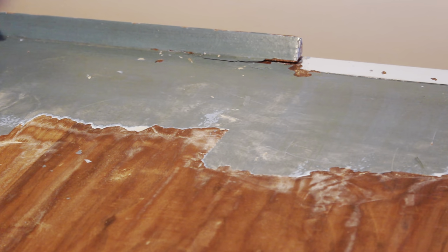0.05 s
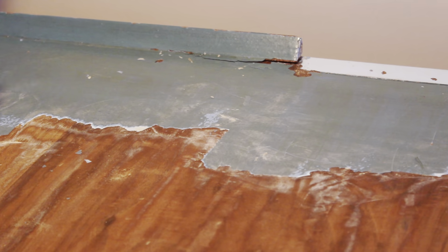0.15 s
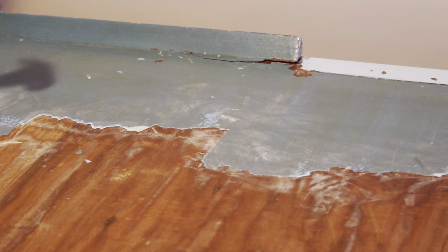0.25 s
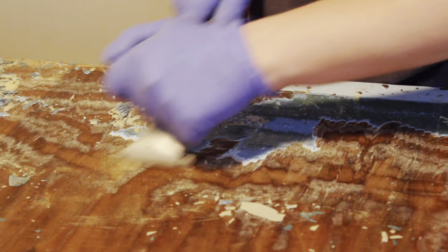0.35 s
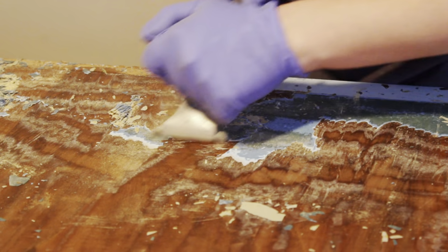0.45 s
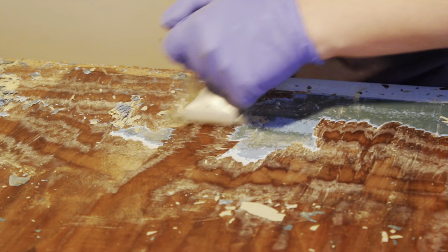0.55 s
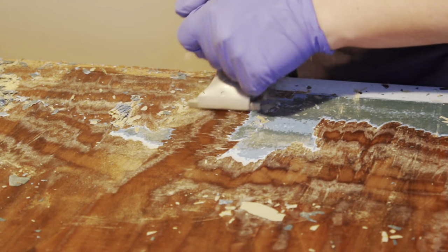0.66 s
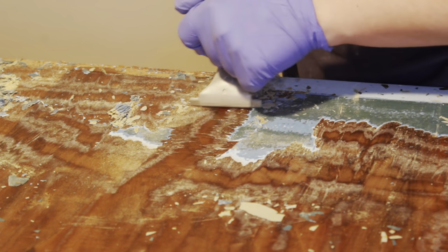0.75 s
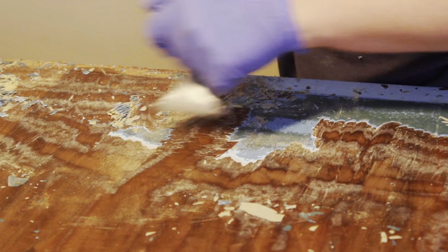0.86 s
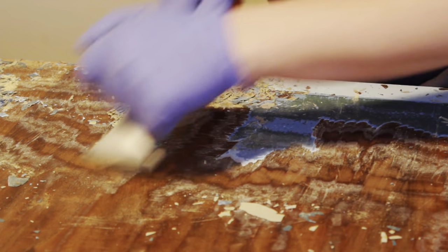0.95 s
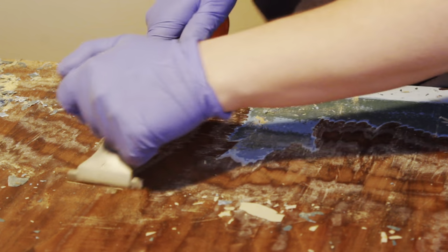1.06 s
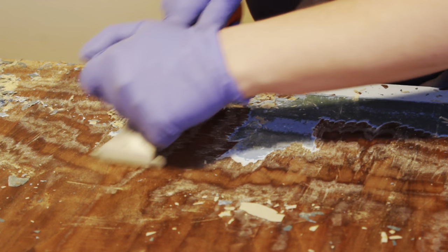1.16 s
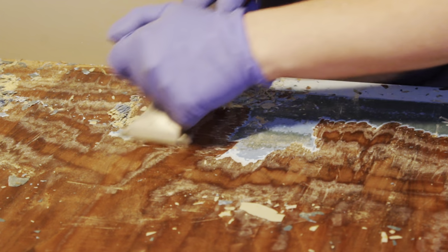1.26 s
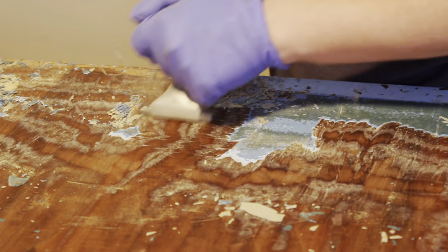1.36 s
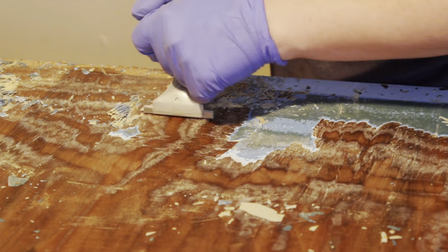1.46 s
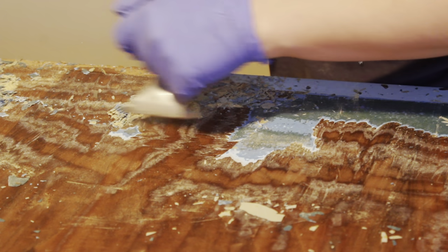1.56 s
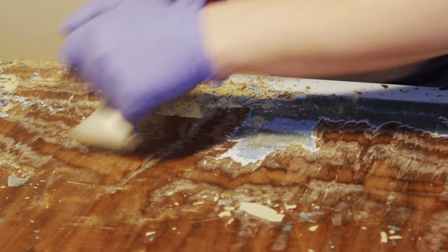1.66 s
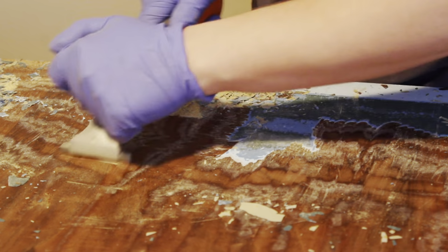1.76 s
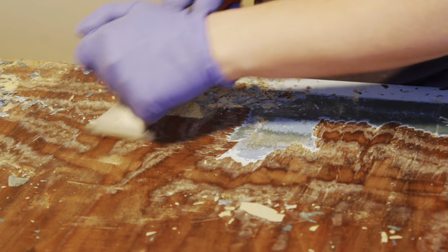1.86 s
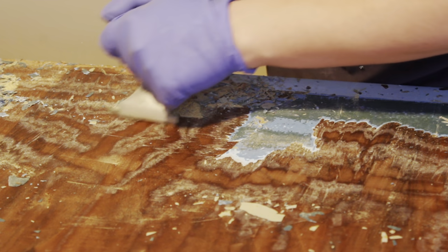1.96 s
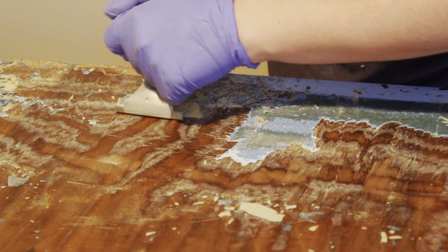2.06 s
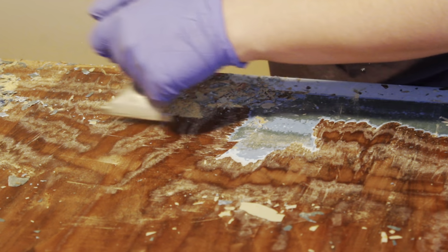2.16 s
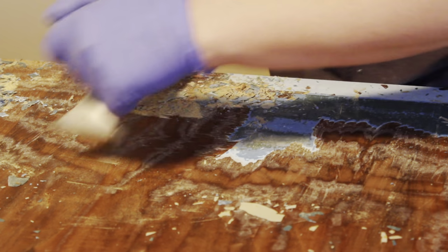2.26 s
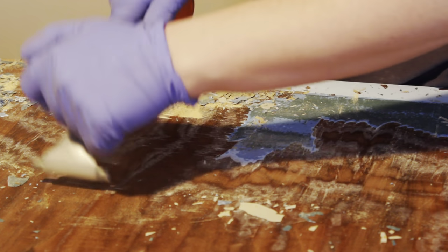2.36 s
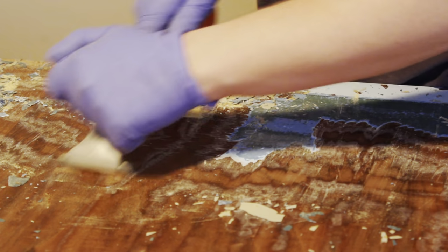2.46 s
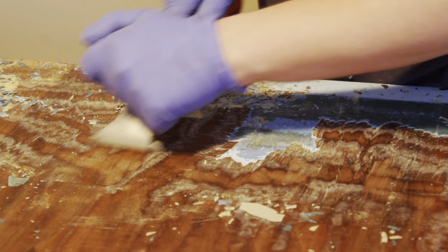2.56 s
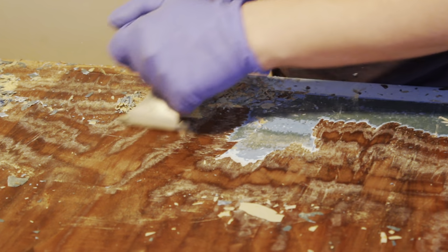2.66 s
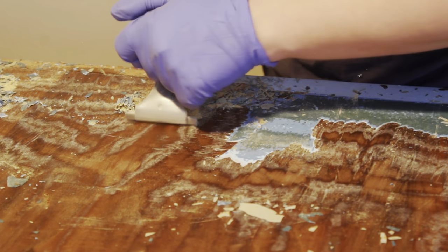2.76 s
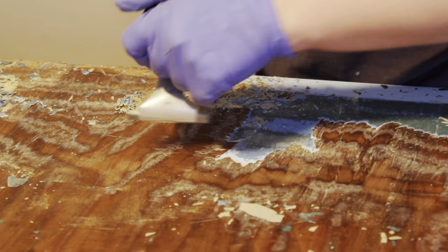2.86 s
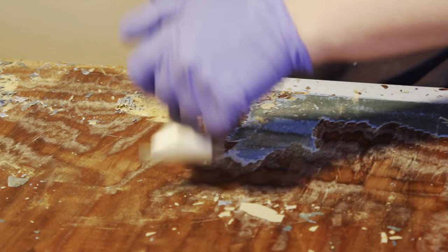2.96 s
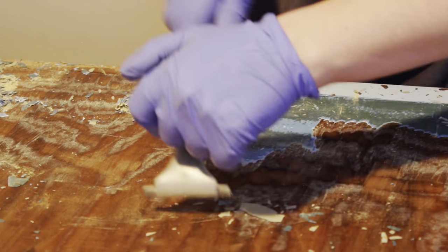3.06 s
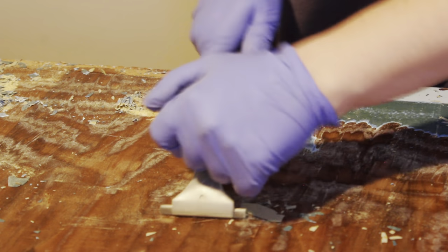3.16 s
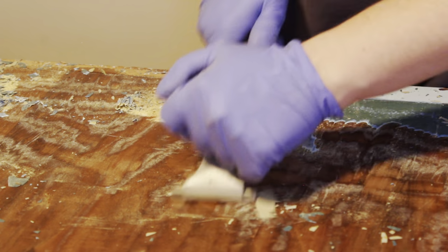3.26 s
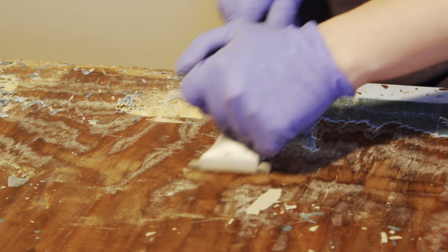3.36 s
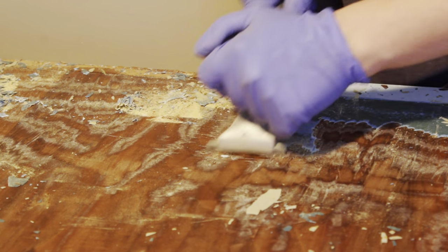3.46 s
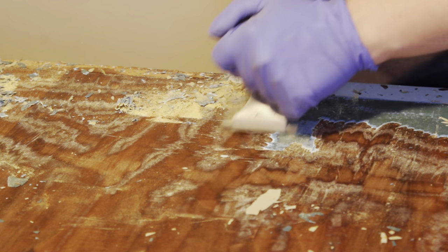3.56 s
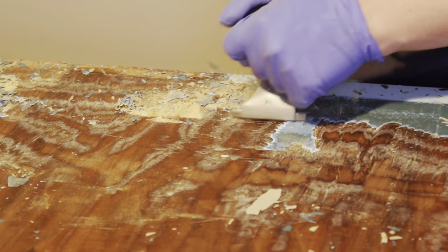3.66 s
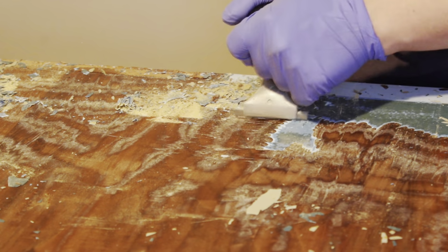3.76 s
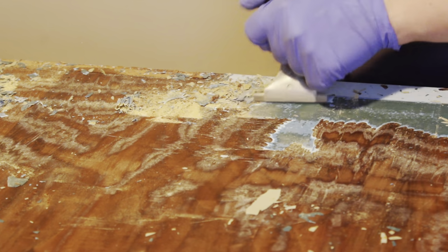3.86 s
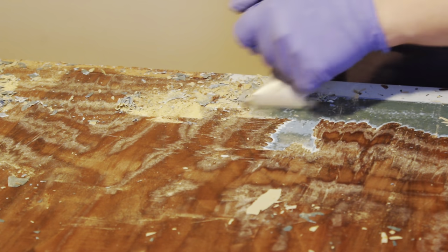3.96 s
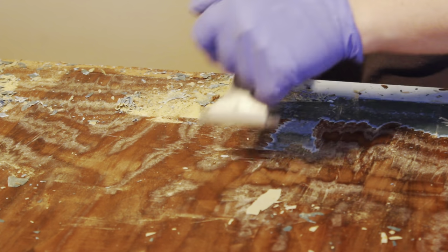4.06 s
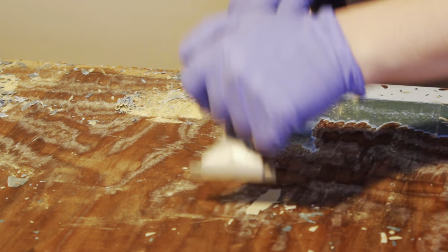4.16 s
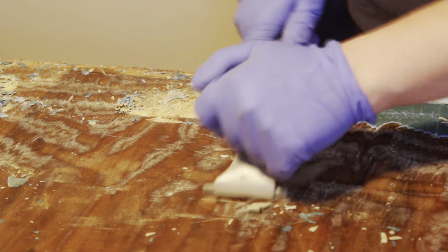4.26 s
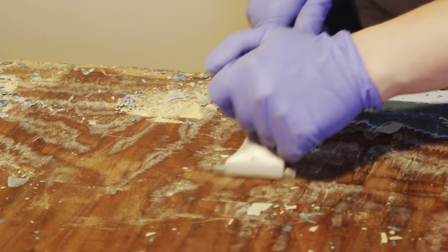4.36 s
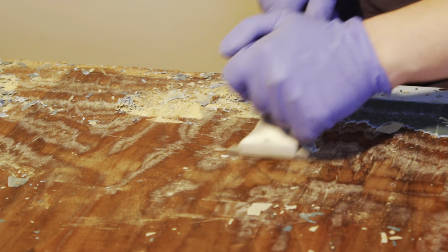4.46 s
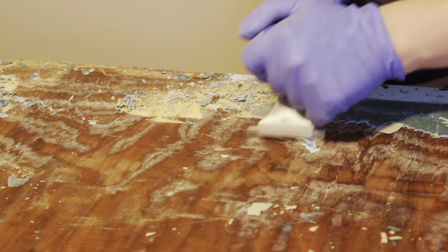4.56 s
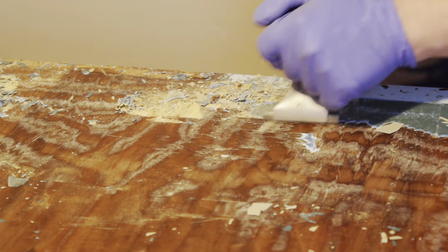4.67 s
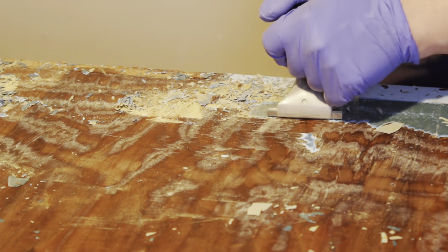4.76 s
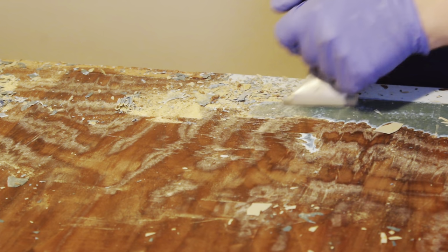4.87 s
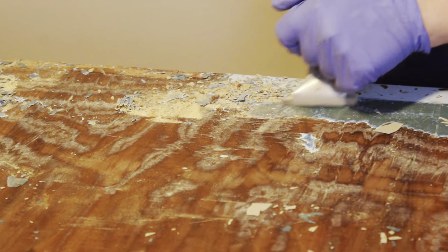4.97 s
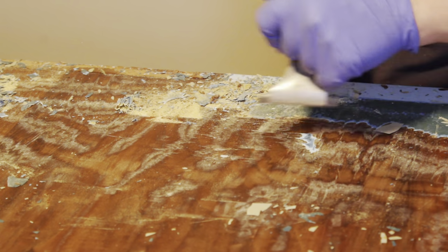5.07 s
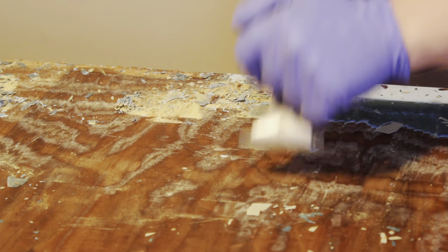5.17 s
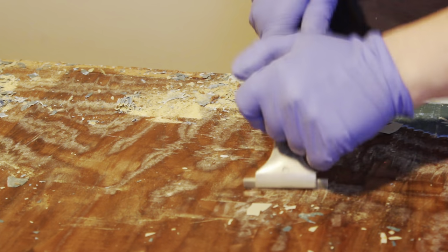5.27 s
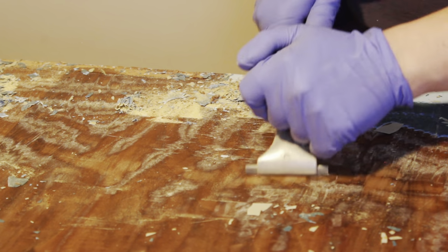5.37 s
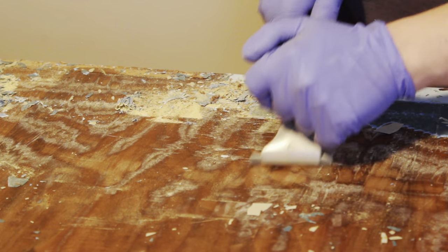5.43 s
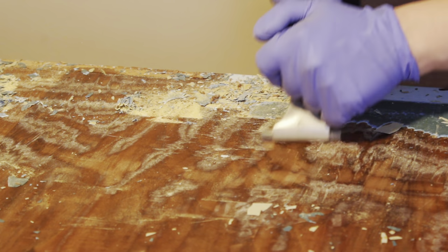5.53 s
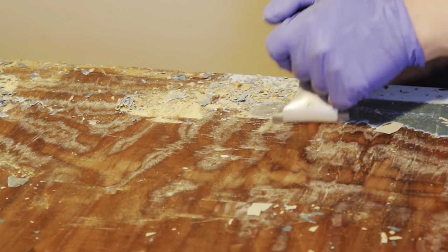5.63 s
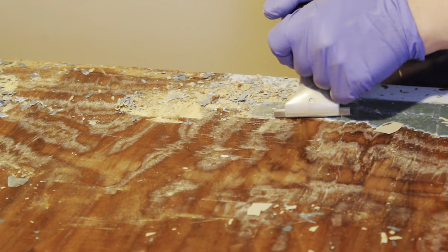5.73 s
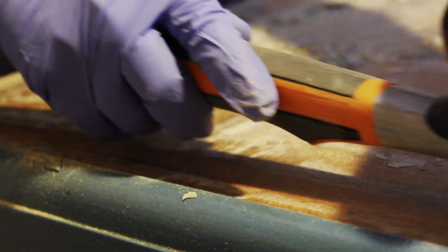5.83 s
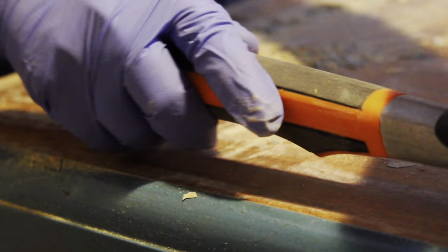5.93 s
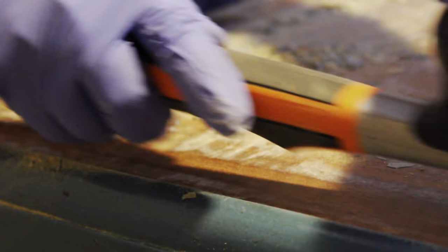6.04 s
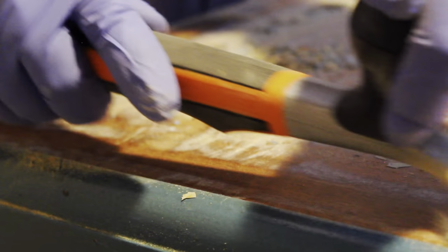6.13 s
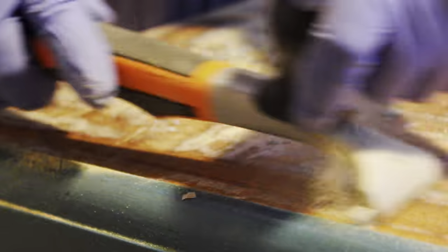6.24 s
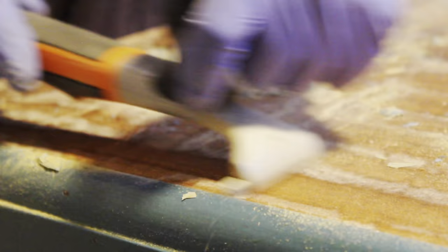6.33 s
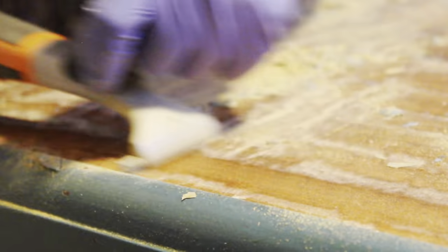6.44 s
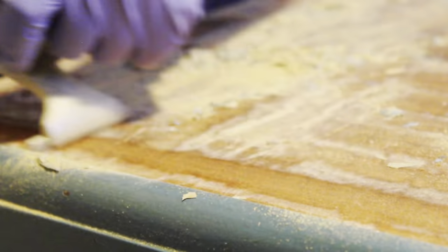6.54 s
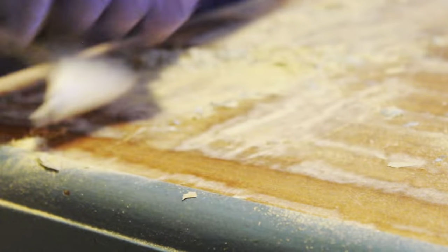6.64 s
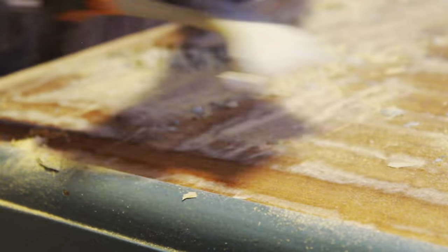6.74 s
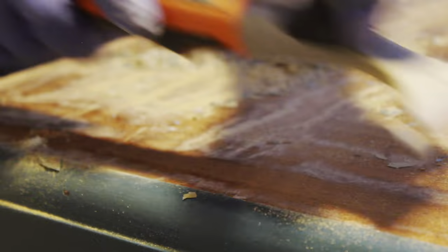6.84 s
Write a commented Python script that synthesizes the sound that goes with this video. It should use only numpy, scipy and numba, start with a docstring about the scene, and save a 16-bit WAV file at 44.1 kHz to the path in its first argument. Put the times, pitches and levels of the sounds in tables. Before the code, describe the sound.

In a bare indoor room, a low rustle, soft bump and hard clack lead into seven rough strokes of a steel scraper on painted wood. Each rasp bites early and fades; flakes snap, and the blade knocks hollowly on the board between strokes. Heard from a few steps away, loud and slightly overloaded. Finally, close to the microphone, a light tap and one bright, gritty scrape with the blade singing.

```python
"""A gloved hand pulls a steel scraper over a painted wooden top in a bare room: three moments joined by short fades.
First a rustle, a bump and a hard clack: shaped noise, and short rattles of contact into resonant bodies.
Then seven strokes from a few steps away: grit shakes board and blade, paint flakes snap, and the blade knocks
down on the board as ringing modes before all but the first; this moment overloads.
Last the blade is tapped down and makes one close stroke, bright grit with bands of the blade singing."""
import sys
import numpy as np
from scipy import signal
from scipy.fft import rfft, irfft
from scipy.io import wavfile
from numba import njit

SR = 44100
rng = np.random.default_rng(int(sys.argv[2]) if len(sys.argv) > 2 else 0)


def wrap_up_sound(samples):
    """Save the sound to the file named by the first command line argument, as 16-bit audio."""
    columns = np.atleast_2d(samples).T
    # keep every value between -1 and 1, then stretch to whole-number steps
    tamed = np.clip(columns, -1, 1)
    steps = np.round(tamed * 32767).astype(np.int16)
    wavfile.write(sys.argv[1], SR, steps)


N = 304290
CLOCK_S = np.arange(N) / SR

# Pressure of the edge through each stroke: land, drag back, bite, ease off.
# Each row of a stroke: time in seconds, rasp in dB ahead of the paths to the listener, treble in dB over that rasp.
STROKE_PRESSURE = [
    [(0.385, -59, 2), (0.417, -39, -4.5), (0.429, -35.5, -9), (0.513, -42.5, -9), (0.633, -39, -10.5),
     (0.693, -50, -11.5), (0.809, -55.5, -16.5), (0.933, -69, -28), (1.03, -76, -11)],
    [(1.09, -55, -6), (1.112, -57, -7), (1.248, -45, -5), (1.264, -34, -11), (1.312, -43.5, -7.5),
     (1.42, -52, -8.5), (1.624, -72, -20), (1.646, -75, -11), (1.72, -78, -6)],
    [(1.78, -54, -9), (1.828, -57, -13), (1.85, -56.5, -4), (1.876, -49.5, -4), (1.886, -43.5, -7.5),
     (2.058, -57.5, -7), (2.206, -71.5, -22), (2.254, -82, -11), (2.41, -86, -8)],
    [(2.47, -51, -11), (2.564, -52.5, -8.5), (2.592, -51.5, -3), (2.656, -46.5, -5), (2.818, -57, -11.5),
     (2.888, -67, -13), (2.9, -64, -19), (2.984, -77, 0), (3.006, -67.5, -2), (3.078, -77.5, 4.5),
     (3.14, -70, 5)],
    [(3.2, -62, -10), (3.254, -53, -5), (3.412, -43, -6), (3.43, -34.5, -11.5), (3.532, -44.5, -8),
     (3.606, -38, -12), (3.77, -49.5, -17), (3.846, -48, -8), (4.146, -75, -9), (4.192, -82, 8.5),
     (4.29, -82, 9)],
    [(4.35, -43, -8), (4.36, -49, -8), (4.408, -49, -16), (4.55, -49, -3.5), (4.558, -38.5, -4.5),
     (4.65, -37.5, -11.5), (4.846, -52.5, -15), (4.912, -52, -6), (5.068, -67.5, -9.5), (5.224, -86, 11),
     (5.3, -84, 9.5)],
    [(5.36, -50.5, -12), (5.456, -53, -14.5), (5.526, -51, -6), (5.554, -37.5, -8.5), (5.662, -44.5, -8.5),
     (5.72, -41.5, -14), (5.754, -47.5, -10), (5.77, -46, -14), (5.8, -55, -12), (5.81, -71, -15)],
]
# Where on the board each stroke runs.
# Each row: start in seconds, then deep boom, board tone and hollow tone in dB over a firm rasp.
STROKE_PLACES = [(0.38, -12, -5, -12), (1.04, -11, -7, -11.5), (1.73, -12, -5.5, -10),
                 (2.42, -12, -8.5, -16), (3.15, -9.5, -6.5, -12), (4.3, -12, -5, -15.5),
                 (5.31, -9.5, -8, -15.5)]
# Broad colour of the scrape. Each row: frequency in Hz, relative density in dB per Hz.
RASP_COLOUR = [(24, -27), (40, -30), (155, 0), (185, 0), (256, -8), (345, 0.5), (412, -7), (1340, -5.5),
               (1480, -6.5), (2150, -6), (3830, -6.5), (5180, -14), (6170, -8.5), (16000, -55)]
# What board and blade ring with. Each row: frequency in Hz, width in Hz, level in dB over the broad colour.
BOARD_MODES = [(189.5, 6.5, 21), (232, 14, 9), (300, 30, 4), (350, 61, -2.5), (418, 19, 1), (498, 54, 7.5),
               (546, 13, -21), (696, 33, 1.5), (710, 53, 3.5), (811, 31, 6.5), (885, 34, 5.5),
               (1321, 58, 6.5), (1646, 37, 1), (1830, 49, -1), (1903, 25, 6), (2094, 14, 5), (2199, 51, 6),
               (2391, 20, 1), (2610, 32, -14), (2820, 21, 2), (3030, 106, 4.5), (3790, 26, 6.5),
               (4220, 46, 2)]
# The band where the edge bites hardest moves with the blade's angle. Each row: time in seconds, frequency in Hz.
BITE_PITCH = [(0.4, 2780), (0.73, 2200), (0.79, 1550), (0.86, 1870), (0.97, 1500), (1.0, 2380),
              (1.09, 2030), (1.26, 2500), (1.66, 1810), (1.69, 2320), (1.81, 1580), (1.87, 2260),
              (2.32, 1810), (2.39, 2990), (2.46, 2260), (2.73, 2520), (3.11, 1550), (3.21, 1600),
              (3.24, 2830), (3.74, 1920), (3.84, 2700), (3.99, 1480), (4.2, 1380), (4.25, 3260),
              (4.4, 1980), (4.49, 2330), (4.55, 3520), (4.62, 2200), (4.84, 1520), (4.91, 2110),
              (5.08, 1390), (5.23, 1700), (5.27, 3240), (5.41, 1620), (5.51, 2690), (5.8, 2150)]
# The blade whistles while it skims lightly.
# Each row: peak time in seconds, peak in dB, rise in seconds from 20 dB down, fall in seconds to 20 dB down.
SKIM_WHISTLES = [(1.3, -62.5, .25, .3), (1.89, -55, 0.06, 0.2), (2.6, -57, .1, 0.25), (3.3, -53, .07, 0.03),
                 (3.88, -66, .1, 0.3), (4.52, -60, .2, 0), (4.89, -59.5, .04, .3), (5.56, -51, .04, 0)]
# A dull rub on the board as the tool slides off.
# Each row: peak time in seconds, peak in dB ahead of the paths to the listener, rise and fall in seconds over 20 dB.
SLIDE_OFFS = [(.85, -65.5, .1, .2), (2.99, -64, .04, 0.21), (3.99, -51, 0.077, 0.21),
              (4.86, -57, 0.13, 0.31)]
FIRM_DB, BOOM_FOLLOWS, TONE_FOLLOWS = -42, 0.82, 0.87  # the board swings less than the rasp as pressure changes
BITE_WIDTH_HZ, BITE_DB = 1200, -10
WHISTLE_HZ, WHISTLE_WIDTH_HZ = 6060, 270
SKIM_DB = -58  # under this rasp level the blade is lifting and its whistle sinks away
RUB_HZ, RUB_WIDTH_HZ, RUB_DB = 1200, 500, -6  # the slide-off rub gathers here


def strokes():
    """Grit shakes board and blade; pressure drives rasp, boom and board tones together. Returns rasp and treble."""
    rasp_db, treble_db = in_time(np.vstack(STROKE_PRESSURE))
    start_s, boom_db, tone_db, hollow_db = np.transpose(STROKE_PLACES)
    place = np.maximum(np.searchsorted(start_s * SR, np.arange(N)) - 1, 0)

    grip = judder(rate_hz=153, depth_db=2.5)
    wood = body(RASP_COLOUR, BOARD_MODES)
    scrape = through(grip * grit(per_s=1200., spread_db=3.8, smooth=0.9), wood)
    rasp, boom, tone, _, hollow = map(rms_one, ranges(scrape))
    dust = through(grip * grit(per_s=4000., spread_db=2.5, smooth=0.75), wood)  # finer grit
    hiss = rms_one(ranges(dust)[3])
    whistle = resonate(rng.standard_normal(N), WHISTLE_HZ, WHISTLE_WIDTH_HZ)
    whistle = whistle * from_db(np.minimum(rasp_db - SKIM_DB, 0))
    bite = resonate(rasp + tone, in_time(BITE_PITCH)[0], BITE_WIDTH_HZ)
    rasp = rms_one(rasp + from_db(BITE_DB) * bite)

    def board_gain(db, follows):
        """Level of a board range as the pressure changes."""
        return from_db(FIRM_DB + db[place] + follows * (rasp_db - FIRM_DB))

    slide_off = swells(SLIDE_OFFS)
    rub = from_db(RUB_DB) * slide_off * resonate(tone, RUB_HZ, RUB_WIDTH_HZ)
    low = (from_db(rasp_db) * rasp
           + board_gain(boom_db, BOOM_FOLLOWS) * boom
           + board_gain(hollow_db, BOOM_FOLLOWS) * hollow
           + (board_gain(tone_db, TONE_FOLLOWS) + slide_off) * tone
           + rub)
    treble = from_db(rasp_db + treble_db) * hiss + swells(SKIM_WHISTLES) * whistle
    return low, treble


# The blade set down, each time on another spot and so with its own mix of modes.
# Each row: time in seconds, then the height of each struck mode in the spectrum in dB.
BLADE_KNOCKS = [(1.0385, 17.5, 9, 13, 16.5, 3, 6, 7, 4, -16, -15, -9, -2.5, -0.5, -9, -4.5, -4, -7.5, -12, -18.5, -45),
                (1.7291, 16.5, 8, 13, 16.5, 2, 3.5, 12.5, 11.5, 3, -3, -2, 2, 2.5, -5, -0.5, -1.5, -3, -11, -16.5, -38),
                (2.4205, 20, 12, 6, 12, 2, 3.5, 7.5, 4, -6, -7, -4.5, -5, -1, -1.5, -4.5, -4, -9, -19, -23, -46),
                (3.1484, 25, 18.5, 10, 17, 6, 12.5, 11, 3, -8, -6, -1, -8, -10, -10, -5.5, -16, -26, -21, -25, -43),
                (4.297, 22, 13.5, 5, 9, 9, 11.5, 12.5, 7, 4, 5, 3.5, 3, 2, 5, 2, 6.5, 0, -8, -7.5, -14.5),
                (5.313, 20, 13.5, 6, 8, 10, 12.5, 10, 6, -1, 1, -2, 0.5, -2, -1, 0.5, 1, -0.5, -11, -13.5, -31)]
# What a landing sets ringing, board below and blade above. Each row: frequency in Hz, width in Hz.
STRUCK_MODES = [(189, 13), (231, 22), (360, 44), (478, 42), (575, 52), (700, 46), (810, 36), (900, 46),
                (1130, 83), (1300, 79), (1490, 105), (1660, 80), (1850, 97), (2100, 110), (2470, 210),
                (3100, 315), (3900, 420), (5200, 700), (6500, 900), (11500, 3000)]
BOUNCE_S, BOUNCE_DB, BOUNCE_TOP_HZ = .027, -6.5, 2440  # the blade bounces once, softer and duller
RUMBLE_DB, RUMBLE_FALL_S, RUMBLE_TOP_HZ = -35, .12, 1300  # the board rumbles on; fall to 20 dB down
CRACK_DB, CRACK_FALL_S, CRACK_FROM_HZ = -14, .0035, 4300  # the edge rattles as it lands; fall to 20 dB down


def knocks():
    """The blade lands as a sum of dying modes, bounces once and leaves the board rumbling."""
    t = np.arange(SR // 2) / SR
    landing = np.zeros(N)
    rings = []
    for k, (hz, width) in enumerate(STRUCK_MODES):
        sign = (-1) ** max(k, 1)
        unit_height = 2 * np.pi * width / SR  # makes the spectral peak 1
        rings.append(sign * unit_height * np.exp(-np.pi * width * t) * np.sin(2 * np.pi * hz * t))
    rings = np.array(rings)
    shakes = rng.standard_normal((len(BLADE_KNOCKS), len(t)))
    for (s, *heights_db), shake in zip(BLADE_KNOCKS, shakes):
        hit = band(from_db(heights_db) @ rings, 130, 19500)
        bounce = from_db(BOUNCE_DB) * np.roll(band(hit, 100, BOUNCE_TOP_HZ), round(BOUNCE_S * SR))
        rumble_noise = shake * from_db(RUMBLE_DB - 20 * t / RUMBLE_FALL_S)
        rumble = through(rumble_noise, band(hit, 110, RUMBLE_TOP_HZ))
        crack_noise = shake * from_db(CRACK_DB - 20 * t / CRACK_FALL_S)
        crack = through(crack_noise, band(hit, CRACK_FROM_HZ, 19500))
        at = round(s * SR)
        landing[at:at + len(t)] += hit + bounce + (rumble + crack)[:len(t)]
    return landing


# Paint flakes snapping off. Each row: time in seconds, peak in dB, thin tick in dB over that peak, pitch in Hz.
PAINT_FLAKES = [(0.415, -25, -28, 3000), (0.4223, -26, -35, 2800), (0.427, -21.5, -33, 3100),
                (0.44, -22, -35, 2500), (0.4474, -23, -37, 3400), (0.4658, -26.5, -37, 3000),
                (0.554, -31, -40, 2800), (0.6275, -26, -40, 3200), (1.261, -30, -40, 2200),
                (1.2666, -20, -40, 2780), (1.278, -29, -40, 2500), (1.283, -29, -40, 2500),
                (1.89, -31, -38, 2350), (3.422, -27, -35, 2500), (3.4311, -21.5, -30, 3000),
                (3.4428, -24, -42, 2800), (3.446, -25, -40, 2800), (3.4487, -24, -40, 2600),
                (3.4606, -22, -41, 2900), (3.484, -30, -39, 2800), (3.566, -31, -36, 2100),
                (3.607, -31, -40, 2100), (3.6794, -27, -40, 3100), (4.5575, -29, -37, 3700),
                (4.573, -26, -40, 3300), (4.582, -27, -40, 3000), (4.595, -25, -40, 3600),
                (4.6535, -23, -42, 1800), (4.657, -25, -42, 1900), (4.685, -28, -39, 2200),
                (4.7308, -27, -44, 3070), (5.546, -32, -40, 3000), (5.557, -27, -40, 2710),
                (5.591, -26, -40, 2500), (5.686, -31, -33, 2800), (5.717, -26, -48, 3000)]
FLAKE_SPAN, FLAKE_S = 1.4, 0.0009  # a snap spreads by this ratio around its pitch; decay time of its rattle


def flakes():
    """Each flake is a small rattle in its own range of the board, with a thin tick on top."""
    snap = body(RASP_COLOUR, BOARD_MODES)
    sound = blows(PAINT_FLAKES, band(snap, 9000, 18000), column=2)
    for row in PAINT_FLAKES:
        own_range = band(snap, row[3] / FLAKE_SPAN, row[3] * FLAKE_SPAN)
        sound = sound + blows([row], own_range, contact_s=FLAKE_S)
    return sound


# Pressure through the close stroke, in levels ahead of the room.
# Each row: time in seconds, rasp in dB, board in dB, chatter band in Hz, chatter in dB over the rasp.
CLOSE_PRESSURE = [(5.82, -75, -60, 4800, -20), (5.86, -73, -60.5, 4800, -20), (5.9, -68, -53.5, 4800, -20),
                  (6.04, -77, -64.5, 4800, -15), (6.05, -64, -64, 4800, -15), (6.064, -66, -59, 4800, -15),
                  (6.068, -52.5, -58, 4700, -18), (6.087, -48.5, -53.5, 4600, -16),
                  (6.15, -54.5, -47, 4300, -12), (6.2, -48, -49, 4400, -7), (6.232, -44, -56.5, 4600, -2),
                  (6.27, -51, -62, 4800, -1), (6.3, -48, -59.5, 4900, -3), (6.35, -45, -57, 5140, -4),
                  (6.39, -50.5, -61, 4800, -5.5), (6.45, -47.5, -52, 4250, -4),
                  (6.5, -50.5, -52.5, 4180, -12), (6.6, -55, -51.5, 4070, -8), (6.7, -75, -67, 4030, -2),
                  (6.76, -78, -70, 4000, -8), (6.81, -74, -73, 4000, -12), (6.86, -83, -79, 4300, -15),
                  (6.9, -72, -70, 4300, -18)]
# Colours of the close rasp and board. Each row: frequency in Hz, relative density in dB per Hz.
CLOSE_RASP_COLOUR = [(710, -38), (1200, -10), (1680, -7.5), (1860, -9.5), (2960, -3.5), (4680, -0.5),
                     (6710, -6.5), (7240, -5), (8080, -3.5), (12000, -13), (16200, -23)]
CLOSE_BOARD_COLOUR = [(24, -56), (40, -19.5), (211, -15), (262, -4), (450, -6), (623, -9), (927, -8.5),
                      (1090, -12.5), (1280, -2), (1840, -10), (3000, -16.5), (3900, -15), (6600, -120)]
# Ringing of the blade. Each row: frequency in Hz, width in Hz, level in dB over the broad colour.
BLADE_MODES = [(1680, 25, 10.5), (6530, 200, 3.5)]
# Bands of the blade that sing for a while. Each row: peak time in seconds, peak in dB while pressed,
# rise and fall in seconds over 20 dB, frequency in Hz, width in Hz, glide in Hz per second.
BLADE_SONGS = [(6.09, -54, .03, 0.3, 7760, 620, -3000), (6.236, -40, 0.062, 0.06, 7250, 340, 300),
               (6.31, -54, .1, 0.05, 7400, 360, 1500), (6.26, -51, 0.13, .3, 9000, 450, 1500),
               (6.45, -52.5, 0.14, 0.3, 9200, 450, -1500), (6.57, -55, .1, 0.15, 8800, 300, -2000),
               (6.085, -53.5, 0.033, .2, 11800, 460, -500), (6.25, -55, 0.14, 0.3, 11650, 300, -300),
               (6.45, -62, 0.19, .3, 11900, 600, 300), (6.61, -65, .1, .08, 11800, 600, -500),
               (6.1, -59, .04, .2, 3500, 1200, 500), (6.43, -52.5, .06, 0.4, 3460, 1400, -1500),
               (6.57, -52, 0.088, 0.5, 3300, 1000, -500), (6.58, -52.5, .15, .3, 3050, 220, -300)]
# A faint low drone at the end. First row: peak time in seconds, peak in dB, rise and fall in seconds over 20 dB;
# second row: frequency in Hz, width in Hz.
END_DRONE = (6.82, -70, .15, .3), (131, 14)
CHATTER_WIDTH_HZ = 950
TOP_HISS_DB, TOP_FADE_DB_PER_S, PULL_S = -7.5, -23, 6.1  # the top hiss wears off along the pull, from PULL_S on
SING_DB = -57  # under this rasp level the blade is lifting and its song sinks away
SONG_WAVER_DB = .07  # the singing bands wander in pitch by this frequency ratio, in dB


def close_stroke():
    """Near the edge: bright grit over the board, a chatter band that moves with blade angle, and singing bands."""
    rasp_db, board_db, chatter_hz, chatter_db = in_time(CLOSE_PRESSURE)
    edge = judder(rate_hz=150, depth_db=1.2) * grit(per_s=5600.0, spread_db=3.5, smooth=0.82)
    bright = through(edge, body(CLOSE_RASP_COLOUR, BLADE_MODES))
    rasp = rms_one(band(bright, 1000, 10000))
    top = -rms_one(band(bright, 10000, 19000))
    top_db = TOP_HISS_DB + TOP_FADE_DB_PER_S * np.clip(CLOCK_S - PULL_S, 0, .4)
    chatter = resonate(edge, chatter_hz, CHATTER_WIDTH_HZ)
    board = rms_one(through(rng.standard_normal(N), body(CLOSE_BOARD_COLOUR)))

    dust = grit(per_s=6000.0, spread_db=3.5, smooth=0.8)
    waver = judder(rate_hz=40, depth_db=SONG_WAVER_DB)
    songs = np.zeros(N)
    for s, db, rise, fall, hz, width, glide in BLADE_SONGS:
        pitch_hz = waver * (hz + glide * np.clip(CLOCK_S - s, -.2, .3))
        songs += swells([(s, db, rise, fall)]) * resonate(dust, pitch_hz, width)
    drone = swells(END_DRONE[:1]) * resonate(dust, *END_DRONE[1])
    return (from_db(rasp_db) * (rasp + from_db(top_db) * top + from_db(chatter_db) * chatter)
            + from_db(board_db) * board
            + from_db(np.minimum(rasp_db - SING_DB, 0)) * songs
            + drone)


# The blade tapped down before the close stroke. Each row: time in seconds, peak in dB.
TAP_HITS = [(5.874, -29), (5.881, -29.5), (5.899, -35)]
# Its colour. Each row: frequency in Hz, relative density in dB per Hz.
TAP_BODY = [(59, -58), (100, -13), (244, -26), (358, 4), (608, -23), (721, -3), (1230, 2.5), (1450, -3.5),
            (2170, -8), (2630, -11), (6700, -37), (10000, -45), (16000, -57)]


def taps():
    """Very short contacts shake the board."""
    return blows(TAP_HITS, body(TAP_BODY), contact_s=.0001)


# A soft bump and a hard clack. Each row: time in seconds, peak in dB.
BUMP_HITS = [(0.113, -46), (0.134, -46.5)]
CLACK_HITS = [(0.2384, -17.5)]
# What they ring with. Each row: frequency in Hz, width in Hz, level in dB over the broad colour.
BUMP_RINGS = [(261.5, 22, 35), (353, 50, 4), (534, 69, 4.6)]
CLACK_RINGS = [(974, 30, 7.1), (1270, 50, 14), (1540, 40, 9), (2046, 25, 6), (3343, 40, 6), (3994, 40, 5),
               (1750, 16, 11), (1805, 18, 12.5), (2210, 150, 10.8), (3550, 39, 3.3), (3860, 120, 6.5),
               (2600, 220, 3.2), (5160, 140, 4.2), (5900, 300, 4)]
# Their broad colours. Each row: frequency in Hz, relative density in dB per Hz.
BUMP_BODY = [(80, -18), (200, -16), (500, -4), (1400, -43), (4000, -76)]
CLACK_BODY = [(120, -34), (200, -18), (480, -14), (671, -21), (968, -14), (1100, -18), (1230, -15),
              (1770, -3.5), (2750, -15), (3310, -6), (3900, -8.5), (4430, -19), (5230, -13), (6520, -36),
              (16000, -52)]


def bump_and_clack():
    """A long soft contact rings a low body, a short hard one a bright body."""
    bump = blows(BUMP_HITS, body(BUMP_BODY, BUMP_RINGS), contact_s=0.0037)
    return bump + blows(CLACK_HITS, body(CLACK_BODY, CLACK_RINGS))


# The opening shuffle. Each row: time in seconds, low rustle in dB, thin hiss in dB.
RUSTLE_LEVELS = [(0.0, -58.5, -65), (0.058, -65, -64.5), (0.118, -49.5, -59.5), (0.18, -59.5, -63.5),
                 (0.21, -55.5, -53.5), (0.242, -57, -56), (0.285, -63.5, -69), (0.358, -54, -56),
                 (0.385, -37, -39)]
# Its two colours. Each row: frequency in Hz, relative density in dB per Hz.
RUSTLE_LOW_COLOUR = [(35, -76), (60, -22), (180, -26.5), (255, -7.5), (1310, -11.5), (1650, -28),
                     (1780, -23), (6000, -41), (7800, -58), (13200, -120)]
RUSTLE_HIGH_COLOUR = [(880, -45), (1500, -2.5), (2170, -7), (3500, -5), (3790, -7), (13200, -15.5),
                      (16200, -14)]
HISS_TOP_DB = -13  # top band over the hiss
# The top band swells at the start: peak time in seconds, peak in dB, rise and fall in seconds over 20 dB.
TOP_SIZZLE = (0.1, -61.5, 0.7, 0)


def rustle():
    """Something shuffles low down: coloured noise, with a thin hiss above it."""
    low_db, hiss_db = in_time(RUSTLE_LEVELS)
    low = rms_one(through(rng.standard_normal(N), body(RUSTLE_LOW_COLOUR)))
    hiss = rms_one(through(rng.standard_normal(N), body(RUSTLE_HIGH_COLOUR)))
    top = resonate(rng.standard_normal(N), 12800, 2600)
    top_gain = from_db(hiss_db + HISS_TOP_DB) + swells([TOP_SIZZLE])
    return from_db(low_db) * low + from_db(hiss_db) * hiss + top_gain * top


# How long the room rings. Each row: frequency in Hz, time in seconds to fall 60 dB.
ROOM_DECAY = [(100, 0.3), (300, 0.54), (700, 0.32), (2000, 0.35), (5000, 0.21), (13000, 0.095)]
ROOM_BASS_CUT_HZ = 434  # the echo has little bass below this, so the board's low modes ring clear


def room_tail():
    """Noise in octave bands, each dying at its own rate after the first wall; energy 1."""
    t = np.arange(SR // 2) / SR
    tail = np.zeros(len(t))
    for low in 45 * 2. ** np.arange(9):
        noise = band(rng.standard_normal(len(t)), low, min(2 * low, 20000))
        tail += noise * from_db(-60 * t / at_hz(ROOM_DECAY, 1.4 * low))
    onset = np.clip(t / .003, 0, 1)
    tail = band(tail * onset, ROOM_BASS_CUT_HZ, SR * .45)
    return tail / np.sqrt(np.sum(tail ** 2))


# Colour of the background air. Each row: frequency in Hz, relative density in dB per Hz.
AIR_COLOUR = [(15, -31), (25, -9), (80, 6.5), (161, 1.5), (349, 9), (631, -7), (1030, 7), (1170, 1),
              (4270, -19), (5250, -9), (12000, -42), (15600, -81), (22000, -120)]
AIR_DB = -70.5


def room_air():
    """Steady coloured noise lies under the middle and last moments."""
    return from_db(AIR_DB) * rms_one(through(rng.standard_normal(N), body(AIR_COLOUR)))


def grit(per_s, spread_db, smooth):
    """The edge catches on grain and paint: uneven random clicks over smooth friction noise; rms 1."""
    sizes = from_db(spread_db * np.minimum(rng.exponential(1, N), 5)) * rng.choice([-1, 1], N)
    clicks = rms_one(sizes * (rng.random(N) < per_s / SR))
    return rms_one(clicks + smooth * rng.standard_normal(N))


def judder(rate_hz, depth_db):
    """Stick and slip: the grip on the surface jumps about."""
    return from_db(depth_db * rms_one(band(rng.standard_normal(N), rate_hz / 4, rate_hz)))


def blows(events, response, column=1, contact_s=0.00016):
    """Each blow is a short dying rattle of contacts into a body; a later column offsets its peak in dB."""
    force = np.zeros(N)
    t = np.arange(400) / SR
    for row, rattle in zip(events, rng.standard_normal((len(events), len(t)))):
        contact = np.r_[2., rattle[1:]] * np.exp(-t / contact_s)
        hit = through(contact, response)
        peak_db = row[1] + (row[column] if column > 1 else 0)
        at = round(row[0] * SR)
        force[at:at + len(hit)] += (from_db(peak_db) * hit / np.abs(hit).max())[:N - at]
    return force


def body(colour, modes=(), size=16384):
    """Causal (minimum-phase) impulse response of a broad colour with resonances on top."""
    hz = np.arange(size // 2 + 1) * SR / size
    power = 1 + sum((from_db(db) ** 2) / (1 + (2 * (hz - f) / width) ** 2) for f, width, db in modes)
    cepstrum = irfft(np.log(from_db(at_hz(colour, hz)) * np.sqrt(power)))
    # folding the cepstrum forward makes the phase minimal
    cepstrum[1:size // 2] *= 2
    cepstrum[size // 2 + 1:] = 0
    return irfft(np.exp(rfft(cepstrum)))[:size // 2]


@njit
def sweep(x, hz, r, sr):
    """A two-pole resonance whose centre moves."""
    y = np.zeros(len(x))
    for i in range(2, len(x)):
        y[i] = x[i] - x[i - 2] + 2 * r * np.cos(2 * np.pi * hz[i] / sr) * y[i - 1] - r * r * y[i - 2]
    return y


def resonate(x, hz, width_hz):
    """Twice through one resonance, still or moving; rms 1."""
    r = np.exp(-np.pi * width_hz / SR)
    for _ in range(2):
        if np.ndim(hz):
            x = sweep(x, hz, r, SR)
        else:
            x = signal.lfilter([1, 0, -1], [1, -2 * r * np.cos(2 * np.pi * hz / SR), r * r], x + 1e-18)
    return rms_one(x)


def ranges(x):
    """Split into blade, deep board, board, edge and hollow ranges; signs alternate so that neighbours add up."""
    return (band(x, 1600, 4600), -band(x, 65, 260), -band(x, 520, 1600),
            -band(x, 4600, 18000), band(x, 260, 520))


def swells(rows):
    """Gain that rises to each peak and falls away again, straight in dB; a fall of 0 stops dead."""
    t = np.arange(0, N + 40, 40) / SR
    gain = sum(from_db(db - 20 * np.maximum((s - t) / rise, (t - s) / fall)) for s, db, rise, fall in rows)
    return np.interp(CLOCK_S, t, gain)


def in_time(rows):
    """Table columns as curves, one value a sample."""
    s, *columns = np.transpose(rows)
    return [np.interp(CLOCK_S, s, c) for c in columns]


def at_hz(points, hz):
    """Read a curve on a log-frequency axis."""
    return np.interp(np.log(hz + 1), np.log(np.array(points)[:, 0]), np.array(points)[:, 1])


def band(x, low_hz, high_hz):
    """Band-pass."""
    return signal.sosfilt(signal.butter(2, [low_hz, high_hz], "band", fs=SR, output="sos"), x)


def through(x, response):
    """Convolve."""
    return signal.fftconvolve(x, response)[:N]


def rms_one(x):
    """Scale to rms 1."""
    return x / np.sqrt(np.mean(x ** 2) + 1e-20)


def from_db(db):
    """dB to gain."""
    return 10 ** (np.asarray(db) / 20)


# Joins between the moments. Each row: fade start, silence and full again, all in seconds.
MOMENT_FADES = [(.345, .38, .41), (5.78, 5.817, 5.84)]
OVERLOAD = .076  # the middle moment clips at this amplitude
DIRECT_DB, ECHO_DB = -4.5, -9.5  # how the rasp reaches the listener: straight, and by the walls
KNOCK_ECHO_DB, KNOCK_ECHO_FROM_HZ = -2.5, 480  # the walls return the upper part of a knock
CRACK_BEAM_HZ = 6100  # above this a knock's crack beams at the listener and misses the walls


def scene():
    """Three moments in one room, each faded against the next; the middle one overloads."""
    tail = room_tail()
    air = room_air()

    clack = bump_and_clack()
    first = rustle() + clack + from_db(-2.5) * through(band(clack, 100, 5000), tail)

    landing, snaps = knocks(), flakes()
    rasp, treble = strokes()
    to_walls = (from_db(KNOCK_ECHO_DB) * band(landing, KNOCK_ECHO_FROM_HZ, CRACK_BEAM_HZ)
                + from_db(-9.5) * snaps
                + from_db(ECHO_DB) * (rasp + treble))
    # the treble beams at the listener, so its straight path is not lowered
    middle = landing + snaps + from_db(DIRECT_DB) * rasp + treble + through(to_walls, tail) + air
    middle = np.clip(middle, -OVERLOAD, OVERLOAD)

    tap, close = taps(), close_stroke()
    last = tap + close + through(from_db(2) * tap + from_db(-5) * close, tail) + air

    (a0, a, a1), (b0, b, b1) = MOMENT_FADES
    mix = (first * np.interp(CLOCK_S, [a0, a], [1, 0])
           + middle * np.interp(CLOCK_S, [a, a1, b0, b], [0, 1, 1, 0])
           + last * np.interp(CLOCK_S, [b, b1], [0, 1]))
    return mix[None]


CUTOFF_HZ = 16400  # from here up everything is at least 70 dB down


def record(dry):
    """The top is cut steeply."""
    return signal.sosfilt(signal.cheby2(14, 70, CUTOFF_HZ, fs=SR, output="sos"), dry)


dry = scene()
out = record(dry)
wrap_up_sound(out)
```